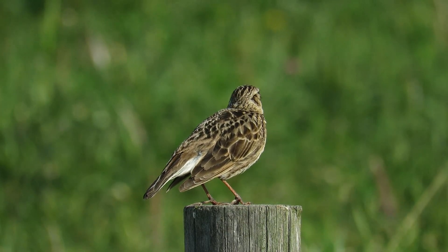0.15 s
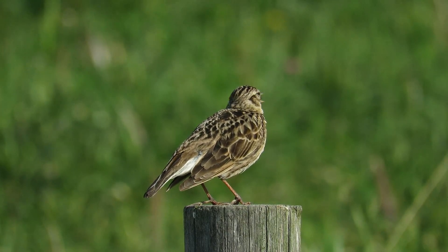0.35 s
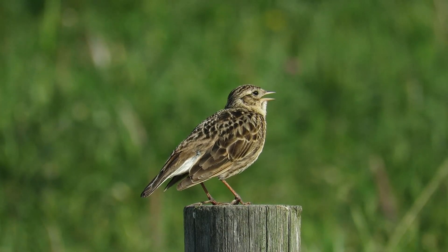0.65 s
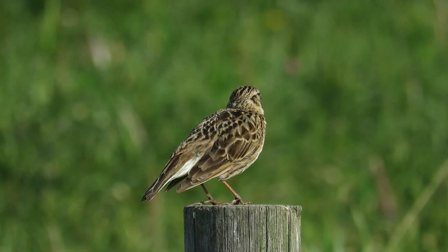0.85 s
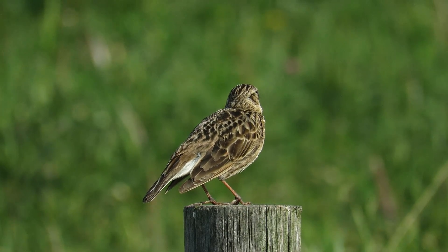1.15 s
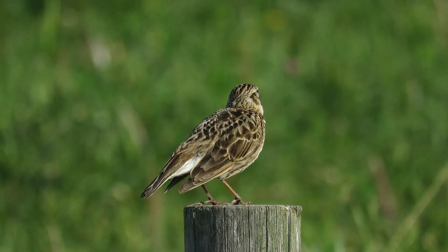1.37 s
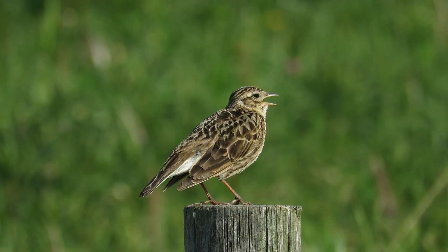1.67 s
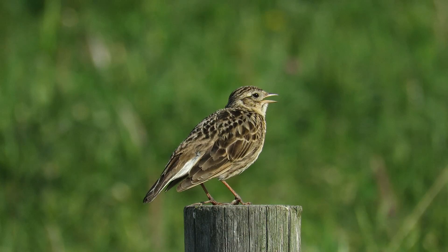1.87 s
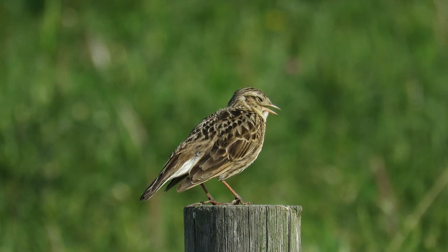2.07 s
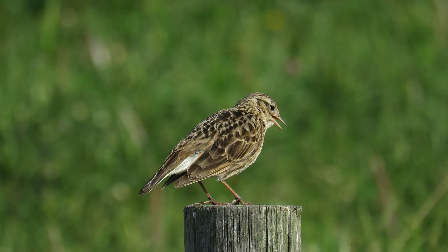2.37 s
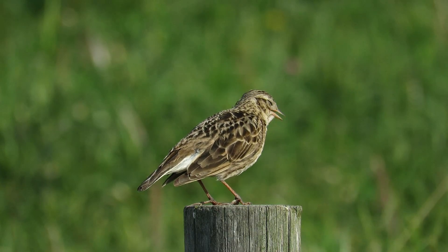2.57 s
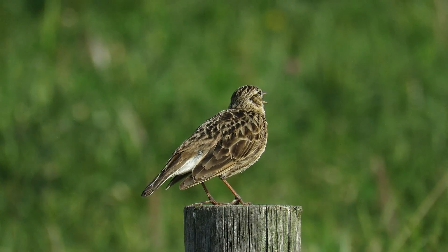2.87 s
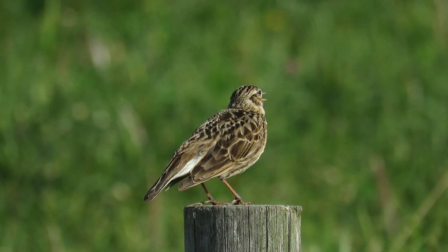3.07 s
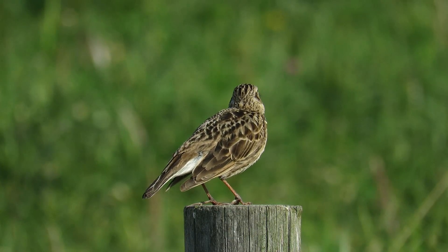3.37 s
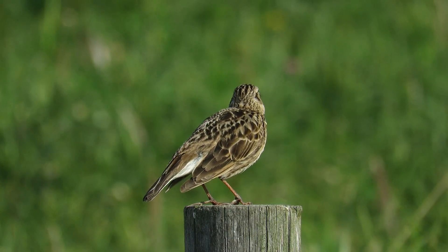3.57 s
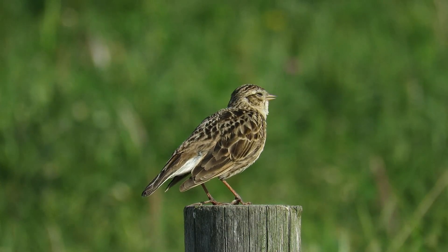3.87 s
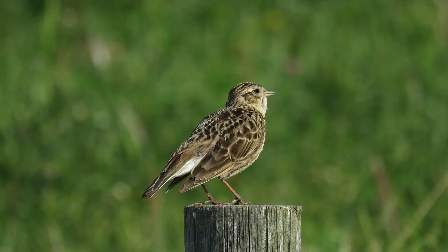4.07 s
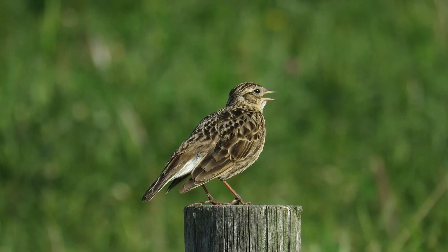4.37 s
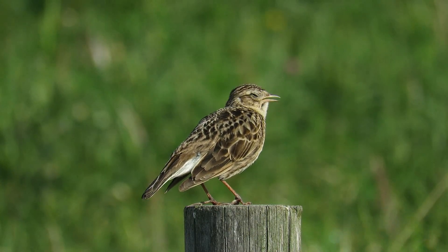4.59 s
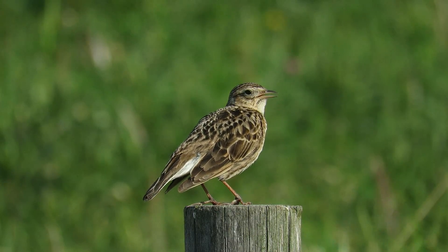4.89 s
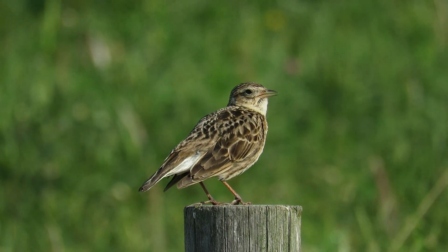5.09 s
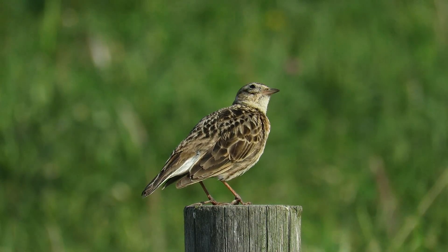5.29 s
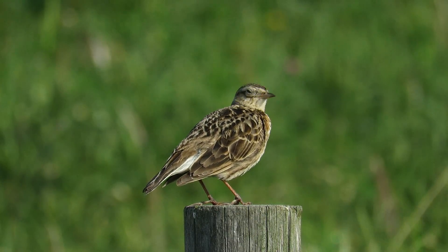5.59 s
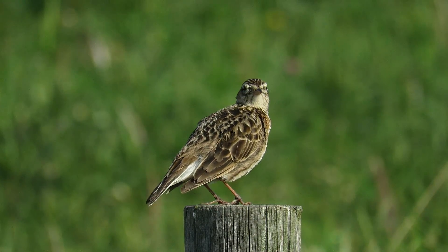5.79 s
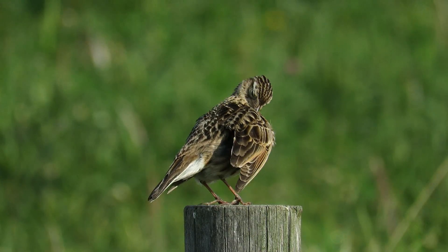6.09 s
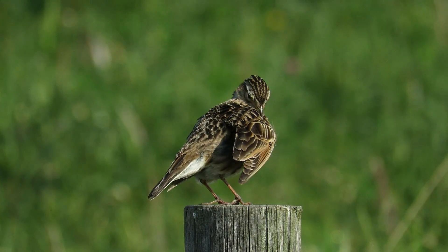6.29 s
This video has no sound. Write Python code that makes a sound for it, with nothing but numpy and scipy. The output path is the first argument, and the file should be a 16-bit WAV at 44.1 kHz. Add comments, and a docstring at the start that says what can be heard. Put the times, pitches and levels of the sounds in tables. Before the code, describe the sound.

Bright, rapid birdsong from one small lark pours out close by in an open field, clear whistles giving way to rattling chips and scratchy rasps.

```python
"""A skylark sings over a steady outdoor murmur with hiss; each clear note is a gliding sine plus its octave.
Whistles, scoops and glides open the song, then a trill of upward flicks; from the third second chirps tumble
into chips, among even rattles, three-step cascades and zigzags, while a far low drone (noise band) swells and fades.
Late, one scoop buzzes, reedy stutters follow and dry rasps (overtone stacks with breath noise) end the song.
Short toneless hisses and hoarse slides fall between; the field adds a short scattered tail and a faint echo."""
import sys
import numpy as np
from scipy import signal
from scipy.fft import rfft, irfft, next_fast_len
from scipy.io import wavfile
from scipy.ndimage import uniform_filter1d, minimum_filter1d, map_coordinates

SR = 44100
rng = np.random.default_rng(int(sys.argv[2]) if len(sys.argv) > 2 else 0)


def materialize(psi):
    """Save the field psi as 16-bit PCM at rate SR to the path in sys.argv[1].

    A 1-D psi becomes a single channel; in a 2-D psi each row is a channel.
    """
    bounded = np.clip(np.atleast_2d(psi).T, -1, 1)
    quanta = np.round(bounded * 32767).astype(np.int16)
    wavfile.write(sys.argv[1], SR, quanta)


N = 284004

# throat resonance, strongest near 4 kHz: (frequency [Hz], gain [dB])
THROAT_RESPONSE = [(1500, -32), (2400, -17), (3300, -8), (4100, 0), (5000, -2), (6000, -7), (7000, -22),
                   (15000, -50)]
# quick arched syllables: (start [s], length [s], pitch [Hz], nominal level [dB], crescendo [dB])
CHIRP_SYLLABLES = [(2.335, 0.025, 4460, -28.0, -1), (2.543, 0.02, 4156, -27, 0),
                   (3.249, 0.022, 4220, -28.5, 1), (3.932, 0.03, 4390, -28, -1),
                   (4.141, 0.021, 4280, -27.5, -12), (4.711, 0.0365, 4430, -30, 7),
                   (4.9463, 0.036, 4350, -31, 8), (5.341, 0.014, 4090, -42, 2)]


def amp(db):
    """Decibels to gain."""
    return 10 ** (np.asarray(db) / 20)


def unit(x):
    """Scale to rms 1."""
    return x / np.sqrt(np.mean(x ** 2) + 1e-20)


def along(points, hz):
    """Interpolate (Hz, value) points on a log-frequency axis."""
    point_hz, values = np.transpose(points)
    return np.interp(np.log(hz + 1), np.log(point_hz + 1), values)


def filtered(x, response):
    """Multiply the spectrum of x by response(Hz), zero-padded against wrap-around."""
    n = x.shape[-1]
    fft_n = next_fast_len(n + 8192)
    spectrum = rfft(x, fft_n) * response(np.fft.rfftfreq(fft_n, 1 / SR))
    return irfft(spectrum, fft_n)[..., :n]


def noise(response, n=N):
    """Gaussian noise coloured by response(Hz), rms 1."""
    return unit(filtered(rng.standard_normal(n), response))


def wobble(rate_hz, n):
    """Smooth random curve: a spline through rate_hz random knots a second."""
    knots = rng.standard_normal(int(n * rate_hz / SR) + 4)
    return map_coordinates(knots, [np.arange(n) * rate_hz / SR])


def progress(length_s):
    """0 to 1 over a note, at least 32 samples."""
    return np.linspace(0, 1, max(int(length_s * SR), 32))


def through(values, u):
    """Polynomial passing through evenly spaced values."""
    order = len(values) - 1
    return np.polyval(np.polyfit(np.linspace(0, 1, len(values)), values, order), u)


def add(track, start_s, sound):
    """Mix a sound into the track, cut at the track's end."""
    start = max(round(start_s * SR), 0)
    part = track[start:start + len(sound)]
    part += sound[:len(part)]


def background(mid_db=-49.0, side_db=-43.5, hum_db=-62):
    """Mid and side coloured noise make a wide murmur with hiss; narrow noise bands make a far drone and hum."""
    # noise spectra: (frequency [Hz], relative density [dB])
    mid_spectrum = [(21, -8), (35, 1.5), (286, -1), (420, -4.5), (667, -8.5), (930, -3.5), (1230, -6),
                    (1720, -12), (3620, -13), (4440, -10.5), (5050, -14), (6520, -15.5), (14800, -17.5),
                    (16000, -21.5)]
    side_spectrum = [(21, -46), (35, -17), (195, -2), (279, -0.5), (907, -9.5), (2340, -20), (3710, -20.5),
                     (4330, -21), (4800, -24), (8010, -26.5), (13700, -26.5), (16000, -29)]
    # far low drone: (time [s], level [dB])
    drone_levels = [(3.0, -59), (3.8, -54), (5.0, -61.5), (6.44, -69)]

    def shaped(points):
        return noise(lambda f: amp(along(points, f)))

    def band(centre_hz, half_width_hz):
        return noise(lambda f: 1 / (1 + ((f - centre_hz) / half_width_hz) ** 2))

    def lean(f):  # left +, right -
        return amp(np.array([[1], [-1]]) * along([(150, -0.97), (900, 2.0), (3000, 0.13)], f))

    mid = amp(mid_db + 0.053 * wobble(3.06, N)) * shaped(mid_spectrum)
    side = amp(side_db) * shaped(side_spectrum)
    murmur = filtered(np.array([mid + side, mid - side]), lean)
    drone_db = np.interp(np.arange(N) / SR, *np.transpose(drone_levels))
    drone = amp(drone_db) * band(85.0, 11.4)
    return murmur + drone + amp(hum_db) * band(284, 26)


def field(song, t60_s=.26, scatter_db=-19, echo_s=.035, echo_db=-26):
    """Grass scatters a short decaying tail, different at each port; one weak echo returns."""
    t = np.arange(SR // 2) / SR
    tail = rng.standard_normal((2, len(t))) * amp(-60 * t / t60_s) * (1 - np.exp(-t / 0.016))
    tail *= amp(scatter_db) / np.linalg.norm(tail[0])
    scattered = signal.fftconvolve(song[None], tail, axes=1)[:, :N]
    echo = filtered(song, lambda f: amp(echo_db) * np.exp(-2j * np.pi * f * echo_s))
    return scattered + echo


def hisses():
    """Air through the bird's throat with no tone: noise shaped by the throat resonance."""
    # (middle [s], length [s], peak level [dB])
    hiss_rows = [(2.733, 0.037, -42.5), (3.23, 0.032, -40), (4.005, 0.035, -39), (4.13, 0.027, -36),
                 (4.293, 0.086, -39.5), (5.186, 0.036, -43), (5.686, 0.023, -47), (5.928, 0.024, -44.5),
                 (6.10, 0.024, -52)]
    out = np.zeros(N)
    for middle_s, length_s, db in hiss_rows:
        u = progress(length_s)
        air = noise(lambda f: amp(along(THROAT_RESPONSE, f)), len(u))
        add(out, middle_s - length_s / 2, amp(db) * np.sin(np.pi * u) * air)
    return out


def syrinx(hz, db, octave_db, edge_s=.0018, jitter=.004, shimmer_db=.6, unrest_hz=600):
    """One vibrating membrane: a sine and its octave, gated by short edges, least steady in fast sweeps."""
    n = len(hz)
    phase = 2 * np.pi * np.cumsum(hz * (1 + jitter * wobble(unrest_hz, n))) / SR
    t = np.arange(n) / SR
    gate = np.sin(np.pi / 2 * np.clip(np.minimum(t, t[-1] - t) / edge_s, 0, 1)) ** 2
    haste = np.tanh(abs(np.gradient(hz)) * SR / 120000)  # sweep rate against 120 kHz/s
    strength = amp(db + (shimmer_db + 2 * haste) * wobble(unrest_hz, n))
    tone = np.sin(phase) + amp(octave_db) * np.sin(2 * phase)
    return np.sqrt(2) * gate * strength * tone


def hoarse():
    """The membrane vibrates chaotically: a slide whose pitch and strength jump about."""
    # (start [s], end [s], first pitch [Hz], last pitch [Hz], nominal level [dB])
    hoarse_rows = [(0.118, 0.145, 3900, 3560, -45), (1.505, 1.55, 3300, 2420, -42),
                   (2.167, 2.253, 2760, 2530, -46), (2.563, 2.599, 3400, 2630, -37.5),
                   (2.59, 2.648, 2700, 2240, -43), (3.033, 3.119, 3430, 2290, -43),
                   (3.247, 3.292, 2900, 2400, -40), (3.606, 3.687, 2045, 3820, -44),
                   (3.652, 3.701, 3800, 1875, -45.5), (3.752, 3.857, 1900, 3290, -45.5)]
    out = np.zeros(N)
    for start_s, end_s, first_hz, last_hz, db in hoarse_rows:
        u = progress(end_s - start_s)
        hz = first_hz + (last_hz - first_hz) * u
        slide = unit(syrinx(hz, 0, -20, jitter=.125, shimmer_db=3.5, unrest_hz=1300))
        add(out, start_s, amp(db) * slide * np.sqrt(abs(np.sin(np.pi * u))))
    return out


def rasps(throat_lift_oct=0.068, throat_sag_oct=0.23):
    """Overtones 3-8 of a low vibration ring in a sinking throat; the tone turns chaotic and airy as it falls."""
    # (crest [s], rise [s], fall [s], crest width [s], pitch at crest [Hz], nominal level [dB])
    rasp_rows = [(4.916, 0.053, 0.044, 0.016, 1183, -37), (5.069, 0.016, 0.048, 0.0055, 887, -35.5),
                 (5.255, 0.042, 0.052, 0.0036, 803, -38), (5.421, 0.023, 0.03, .005, 1205, -35),
                 (5.563, 0.029, 0.045, 0.0061, 1203, -36), (5.714, .035, 0.031, .005, 1218, -35.5),
                 (5.884, 0.033, 0.032, 0.0063, 1200, -36), (6.390, 0.024, 0.046, 0.0064, 1110, -35.5)]

    def throat(f, moment):
        shift_oct = throat_sag_oct * moment - throat_lift_oct
        return amp(along(THROAT_RESPONSE, abs(f) * 2 ** shift_oct))

    out = np.zeros(N)
    for crest_s, rise_s, fall_s, width_s, top_hz, db in rasp_rows:
        t = progress(rise_s + fall_s) * (rise_s + fall_s) - rise_s
        n = len(t)
        u = np.where(t < 0, t / rise_s, t / fall_s)  # -1 start, 0 crest, 1 end
        late = np.maximum(u, 0)
        arch = .8 + .2 * np.exp(-abs(t / width_s) ** 1.6) - .12 * abs(u) - .2 * late
        hz = top_hz * arch * (1 + (.012 + .16 * late ** 2) * wobble(700, n))
        phase = 2 * np.pi * np.cumsum(hz) / SR
        stack = np.zeros(n)
        for k in range(3, 9):
            overtone = np.sin(k * phase + rng.uniform(0, 2 * np.pi))
            stack += throat(k * hz, np.tanh(2 * u)) * overtone
        air = .2 * noise(lambda f: throat(f, 0), n)
        air += .7 * late * noise(lambda f: throat(f, 1), n)
        # the push is strongest in a brief moment around the crest
        effort_db = 2 - 8 * np.tanh((t / .013) ** 2) - 8 * abs(u) + 2.6 * wobble(700, n)
        envelope = amp(db + effort_db) * signal.windows.tukey(n, .2)
        add(out, crest_s - rise_s, envelope * (unit(stack) + air))
    return out


def reeds():
    """Low upward glides that swell 6 dB, with the octave lifted by the throat."""
    # (start [s], end [s], first pitch [Hz], last pitch [Hz], fundamental at end [dB], octave at end [dB])
    reed_rows = [(2.532, 2.543, 2070, 2750, -56, -43), (4.784, 4.818, 2480, 2910, -43, -37.5),
                 (5.018, 5.056, 2230, 2790, -40.5, -38.5)]
    out = np.zeros(N)
    for start_s, end_s, first_hz, last_hz, db, octave_db in reed_rows:
        u = progress(end_s - start_s)
        hz = first_hz + (last_hz - first_hz) * u
        add(out, start_s, syrinx(hz, db + 6 * (u - 1), octave_db - db))
    return out


def add_chip(track, peak_s, hz, db, octave_db, length_s=.012):
    """One push of air that scoops up to its pitch, the octave fading through it."""
    u = progress(length_s) - .62  # 0 at the strongest moment
    pitch_hz = hz * (1 + .15 * u - .7 * u ** 2)
    level_db = db + 1 - 42 * u ** 2
    chip = syrinx(pitch_hz, level_db, octave_db=octave_db - 28 * u, jitter=.025, shimmer_db=1.5)
    add(track, peak_s - .62 * length_s, chip)


def stutters(spacing_s=.0115, sag_hz=65, fade_db=-1.5, count=5):
    """Reedy chips with an overtone, alone or in runs that sag and fade."""
    # runs: (first chip peak [s], first pitch [Hz], nominal level [dB])
    stutter_rows = [(4.815, 3640, -32.5), (5.059, 3480, -35)]
    # single chips: (peak [s], pitch [Hz], nominal level [dB])
    lone_chips = [(3.882, 3580, -37), (5.258, 3630, -31), (5.278, 3360, -34.5)]
    out = np.zeros(N)
    for first_s, hz, db in stutter_rows:
        for k in range(count):
            add_chip(out, first_s + k * spacing_s, hz - k * sag_hz, db + k * fade_db, octave_db=-9)
    for peak_s, hz, db in lone_chips:
        add_chip(out, peak_s, hz, db, octave_db=-26)
    return out


def rattles(pip_s=0.0086, sag_hz=20, taper_db=-0.9, lead_s=0.0078, lead_ratio=.9, lead_db=-8, count=5):
    """Even runs of falling pips, strongest mid-run; a faint lower pip leads into each."""
    # (middle of first pip [s], pip spacing [s], mean pitch [Hz], nominal level [dB])
    rattle_rows = [(2.392, 0.021, 2880, -37), (2.601, 0.022, 2790, -36), (3.307, 0.021, 2830, -37.5),
                   (4.012, 0.02, 2720, -38.5), (4.198, .02, 2680, -40)]
    out = np.zeros(N)
    u = progress(pip_s) - .5
    for first_s, spacing_s, hz, db in rattle_rows:
        for k in range(count):
            place = k - (count - 1) / 2
            start_s = first_s + k * spacing_s - pip_s / 2
            bend = 1 + rng.normal(0, .012) - .13 * u + .25 * u ** 2
            pitch_hz = (hz - sag_hz * place) * bend
            level_db = db + 2 + taper_db * place ** 2 - 36 * u ** 2
            add(out, start_s, syrinx(pitch_hz, level_db, octave_db=-28))
            lead = syrinx(pitch_hz * lead_ratio, level_db + lead_db, octave_db=-30)
            add(out, start_s - lead_s, lead)
    return out


def tumbles(delay_s=0.0047, spacing_s=.0112, first_ratio=.84, step_ratio=.9, drop_db=-3, fade_db=-5, count=3):
    """Every chirp breaks up into a few chips, each lower and weaker than the last."""
    out = np.zeros(N)
    for start_s, length_s, hz, db, _ in CHIRP_SYLLABLES:
        for k in range(count):
            peak_s = start_s + length_s + delay_s + k * spacing_s
            chip_hz = hz * first_ratio * step_ratio ** k
            add_chip(out, peak_s, chip_hz, db + drop_db + k * fade_db, octave_db=-27.5)
    return out


def trill(low_db=-37.0, flick_s=0.015, flick_rise=0.57):
    """Each low note hooks upward into a louder flick."""
    # (start [s], end [s], low pitch [Hz], nominal flick level [dB])
    trill_rows = [(1.156, 1.186, 3590, -30), (1.188, 1.223, 3550, -29), (1.223, 1.254, 3610, -26),
                  (1.256, 1.294, 3425, -23), (1.296, 1.337, 3420, -26.5), (1.338, 1.375, 3383, -27.5)]
    out = np.zeros(N)
    for start_s, end_s, hz, flick_db in trill_rows:
        length_s = end_s - start_s
        u = progress(length_s)
        flick = np.clip(1 - (1 - u) * length_s / flick_s, 0, 1) ** 1.56
        db = low_db + (flick_db - low_db) * np.sin(np.pi * flick) ** 3 - 4 * flick ** 2
        add(out, start_s, syrinx(hz * (1 + flick_rise * flick), db, octave_db=-21))
    return out


def octave_tilt(hz):
    """Throat gain of the octave relative to the fundamental, in dB."""
    return along(THROAT_RESPONSE, 2 * hz) - along(THROAT_RESPONSE, hz)


def syllables(rows, notes, edge_s, octave_db, jitter, shimmer_db):
    """Sing one pattern of notes at each row's pace and pitch; octave_db is ahead of the throat."""
    out = np.zeros(N)
    for start_s, length_s, hz, db, crescendo_db in rows:
        for begin, end, *shape in notes:
            u = progress((end - begin) * length_s)
            pitch_hz = hz * 2 ** (through(shape[:4], u) / 12)
            swell_db = crescendo_db * (begin + (end - begin) * u - .5)
            level_db = db + through(shape[4:], u) + swell_db
            octave = octave_db + octave_tilt(pitch_hz)
            note = syrinx(pitch_hz, level_db, octave, edge_s, jitter, shimmer_db)
            add(out, start_s + begin * length_s, note)
    return out


def glides(rows, swell_db, bend, edge_s, jitter):
    """Plain glides that move slowly at their low end and fast at their high end."""
    out = np.zeros(N)
    for start_s, length_s, first_hz, last_hz, db in rows:
        u = progress(length_s)
        height = u if last_hz > first_hz else 1 - u
        hz = min(first_hz, last_hz) + abs(last_hz - first_hz) * height ** bend
        glide = syrinx(hz, db + through(swell_db, u), -12 + octave_tilt(hz), edge_s, jitter)
        add(out, start_s, glide)
    return out


def buzzed(tone, buzz_hz=370, buzz_depth=.8):
    """A slow second vibration chops the tone for a moment, at level average power."""
    # (start [s], end [s])
    buzz_span = (4.602, 5.1)
    t = np.arange(N) / SR
    chop = np.cos(2 * np.pi * np.cumsum(buzz_hz * (1 + .12 * wobble(400, N))) / SR)
    active = (t > buzz_span[0]) & (t < buzz_span[1])
    depth = uniform_filter1d(buzz_depth * active, size=130)
    return tone * (1 + depth * chop) / np.sqrt(1 + depth ** 2 / 2)


def warble():
    """The clear-toned syllables and the glides that link them, each kind with its own steadiness."""
    # syllables: (start [s], length [s], pitch [Hz], nominal level [dB], crescendo [dB])
    whistle_rows = [(0.649, 0.085, 4215, -24.5, -1), (0.7815, 0.095, 4165, -25.5, -1.5),
                    (0.912, 0.085, 4120, -27.5, -3.0), (2.0395, 0.093, 4190.0, -26, -5),
                    (2.1725, 0.091, 4140, -24.5, 1.5)]
    low_whistle_rows = [(0.053, 0.07, 3267, -28.5, 4.5), (1.443, 0.074, 3150, -29.5, -6)]
    scoop_rows = [(.4135, .085, 5100, -32, 4), (.528, 0.086, 4896, -31, 11), (1.8, 0.081, 5190, -29.5, 6),
                  (1.913, 0.091, 5100, -31.5, 6), (2.9975, .087, 5250, -31.5, -1.5),
                  (3.686, 0.084, 5175, -30, -3), (4.585, 0.091, 5300, -34, -10.5)]
    cascade_rows = [(2.819, 0.062, 4830, -30, -12.0), (3.508, 0.065, 4894, -32.0, 4),
                    (4.4005, 0.0635, 4830, -32.5, 2)]
    zigzag_rows = [(3.116, 0.073, 4800, -32, -0.5), (3.8, 0.071, 5000, -30.5, -3)]
    # notes: (from [share of length], to [share of length], 4 pitches [semitones], 4 levels [dB])
    whistle_notes = [(0.0, 0.194, 0.43, -0.12, -0.6, -1.2, -7.0, -1.1, -4.5, -14),
                     (0.26, 0.997, 0.32, 0.06, 1.14, 1, 2, 0.99, 3, -11)]  # grace note, gently rising tone
    low_whistle_notes = [(0.0, 0.177, 0.44, -2, -1.8, -1.5, -20.0, -7.5, -12, -18.0),
                         (0.195, 0.998, 0.1, 0.5, 0.71, -0.56, -5.5, 1, 2.5, -9.5)]  # faint pip, swelling tone
    scoop_notes = [(0.0, 0.25, 4.2, 1.86, 1.27, 4.3, -3, -2.5, -0.5, -1.0),
                   (0.252, 1.016, 2.35, -0.82, 0.36, 0.75, 11, -0.5, 2, -0.33)]  # grace note, dip and recovery
    cascade_notes = [(0, 0.29, 4, 4, 2.5, 3, -16, -7, -2.5, -7),
                     (0.315, .735, 2.5, 0, 0, 1, 10, 2.5, 2, -4),
                     (0.74, 1.04, -0.8, -2.5, -2.5, -3.5, 6, 10.5, -1, -9)]  # three steps down
    zigzag_notes = [(0.0, 0.238, -8.5, -3.5, 0.5, 4.3, -14, -3, -1.6, 2),
                    (0.244, 0.645, 6, -3.5, -3.5, 2.5, 4.5, -0.5, -0.41, 7),
                    (0.679, 1.0, 6, -2.4, 0.9, -7.5, 1, 2.5, -2.0, 5.5)]  # up, a deep swing, down
    chirp_notes = [(0.0, 0.423, -6.5, -0.5, 0.48, 0.46, -7, 0, 3.3, -2.0),
                   (0.41, 0.988, 1.1, 0.23, -1.07, -1, 0, 6.5, 0.18, 8)]  # quick arch
    # glides up, down: (start [s], length [s], first pitch [Hz], last pitch [Hz], nominal level [dB])
    sweep_rows = [(.204, 0.013, 4470, 6200, -32.5), (.229, .03, 5100, 6660, -32.5),
                  (1.047, 0.014, 3730, 6700, -35), (1.139, 0.016, 4090, 5200, -33),
                  (1.587, .015, 4030, 6230, -29.5), (1.614, 0.024, 4450, 6400, -31),
                  (2.744, 0.019, 3420, 5800, -33.5), (2.778, .018, 4370, 5600, -34.5),
                  (3.439, 0.016, 3260, 6080, -30.5), (3.467, 0.025, 4200, 5700, -29),
                  (4.331, 0.021, 3320, 6000, -35.5), (4.362, 0.017, 4550, 5800, -32.5),
                  (5.207, 0.0084, 3250, 5900, -33.5)]
    slide_rows = [(.27, 0.027, 7000, 5880, -39), (.335, 0.045, 6660, 5510, -33),
                  (1.084, 0.017, 6850, 6600, -40.5), (1.104, 0.022, 6600, 5600, -34.5),
                  (1.124, 0.019, 5400, 4130, -33), (1.657, 0.02, 6800, 5970, -38.5),
                  (1.7135, 0.052, 6450, 5400, -28.5), (2.927, 0.022, 6700, 6400, -40),
                  (2.947, 0.023, 6700, 6380, -39), (3.615, 0.013, 6600, 6400, -34.5),
                  (3.63, 0.02, 6750, 6430, -37), (4.514, .017, 6650, 6250, -37),
                  (4.54, 0.018, 6620, 6070, -43.5)]
    # evenly spaced over a glide: level [dB]
    sweep_swell_db = [-3, -0.5, 3, 0]
    slide_swell_db = [-6, -1.5, 2.5, 5]

    whistles = syllables(whistle_rows, whistle_notes,
                         edge_s=0.0016, octave_db=-18, jitter=0.0025, shimmer_db=0.5)
    low_whistles = syllables(low_whistle_rows, low_whistle_notes,
                             edge_s=0.0036, octave_db=-33, jitter=.003, shimmer_db=1.4)
    scoops = syllables(scoop_rows, scoop_notes,
                       edge_s=0.0037, octave_db=0, jitter=0.002, shimmer_db=1.75)
    cascades = syllables(cascade_rows, cascade_notes,
                         edge_s=0.0011, octave_db=-6, jitter=.004, shimmer_db=0.7)
    zigzags = syllables(zigzag_rows, zigzag_notes,
                        edge_s=0.0012, octave_db=8.0, jitter=0.017, shimmer_db=1.1)
    chirps = syllables(CHIRP_SYLLABLES, chirp_notes,
                       edge_s=0.00073, octave_db=0, jitter=0.014, shimmer_db=0.9)
    sweeps = glides(sweep_rows, sweep_swell_db, bend=1.224, edge_s=0.0016, jitter=0.0059)
    slides = glides(slide_rows, slide_swell_db, bend=1.7, edge_s=0.001, jitter=0.0037)
    return whistles + low_whistles + buzzed(scoops) + cascades + zigzags + chirps + sweeps + slides


def scene():
    """The bird sits a little to the left, so it reaches that port first and louder."""
    # (frequency [Hz], left minus right [dB])
    bird_pan = [(3200, 3), (4300, 1), (5100, 3), (6500, 2.5)]
    lead_s = 52e-6
    ports = np.array([[1], [-1]])  # left, right

    def to_ports(f):
        level = amp(ports * along(bird_pan, f) / 2 - 0.8)
        return level * np.exp(1j * np.pi * f * lead_s * ports)

    song = hisses() + hoarse() + rasps() + reeds() + stutters() + rattles() + tumbles() + trill() + warble()
    return background() + field(song) + filtered(song, to_ports)


def record(dry, ceiling=.17, top_hz=15950):
    """A limiter shared by both channels holds down the loudest notes; a steep low-pass sets the band limit."""
    needed = ceiling / np.maximum(abs(dry).max(axis=0), ceiling)
    gain = uniform_filter1d(minimum_filter1d(needed, size=180), size=180)
    return filtered(dry * gain, lambda f: f < top_hz)


dry = scene()
out = record(dry)
materialize(out)
```